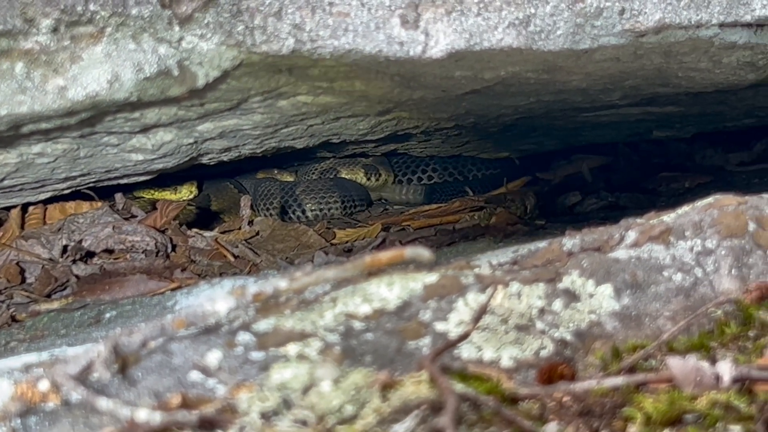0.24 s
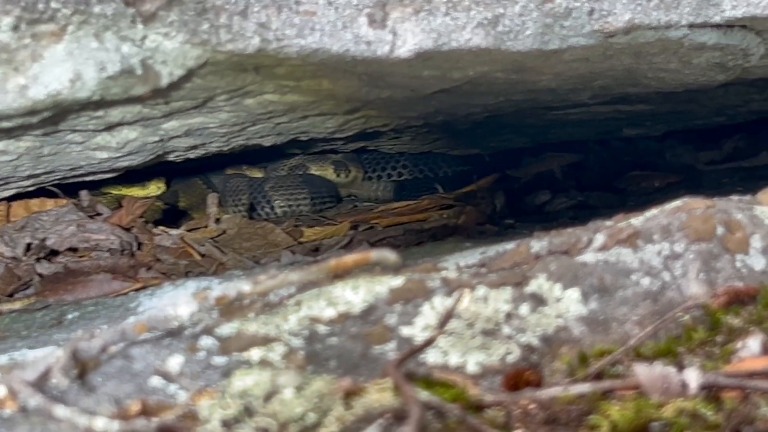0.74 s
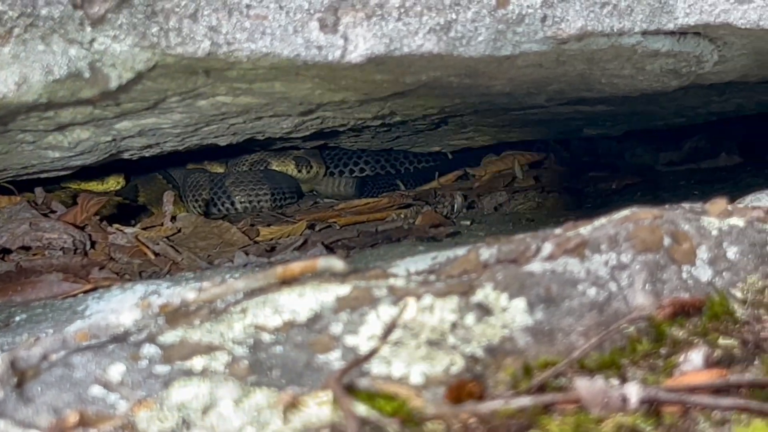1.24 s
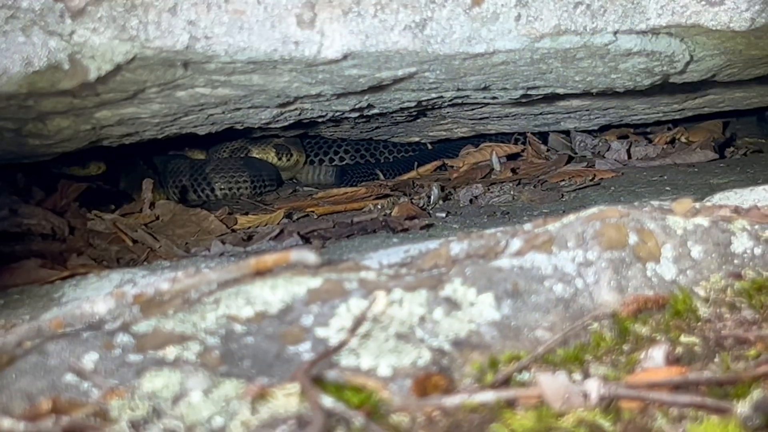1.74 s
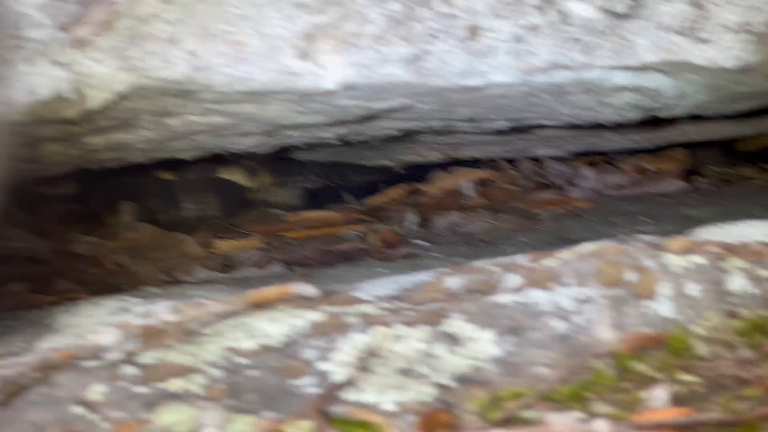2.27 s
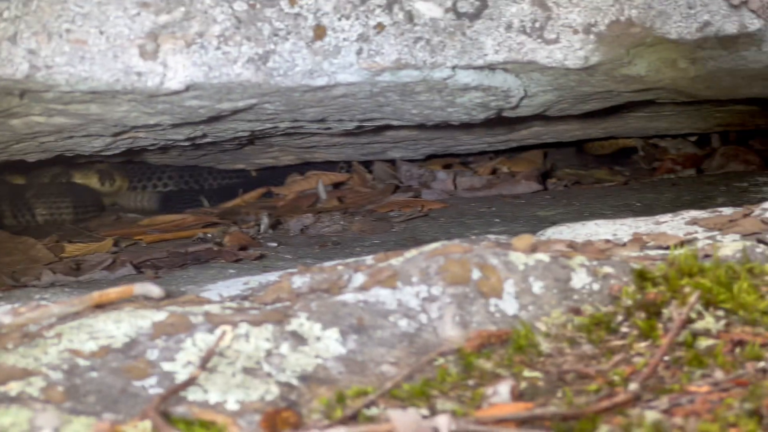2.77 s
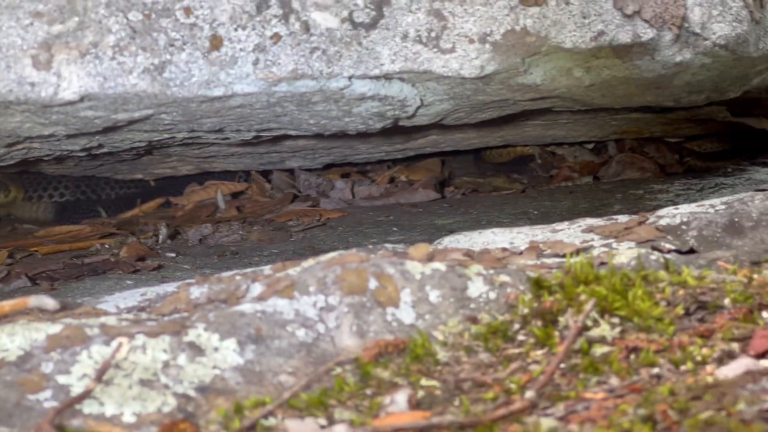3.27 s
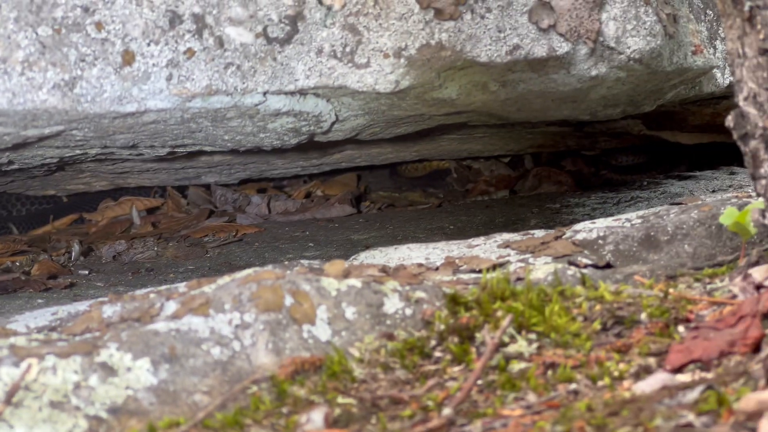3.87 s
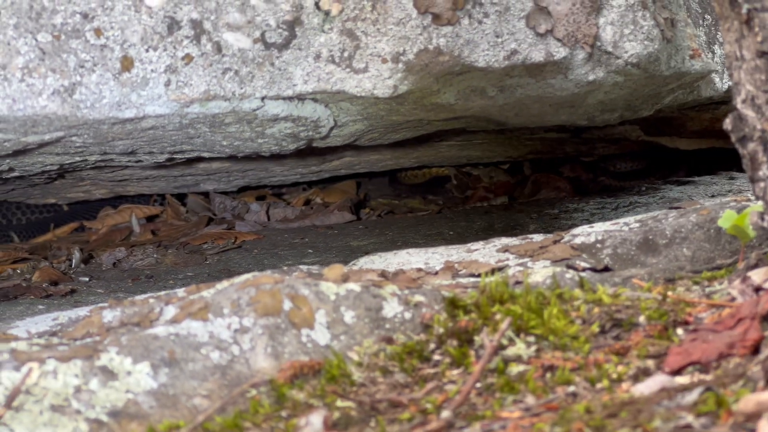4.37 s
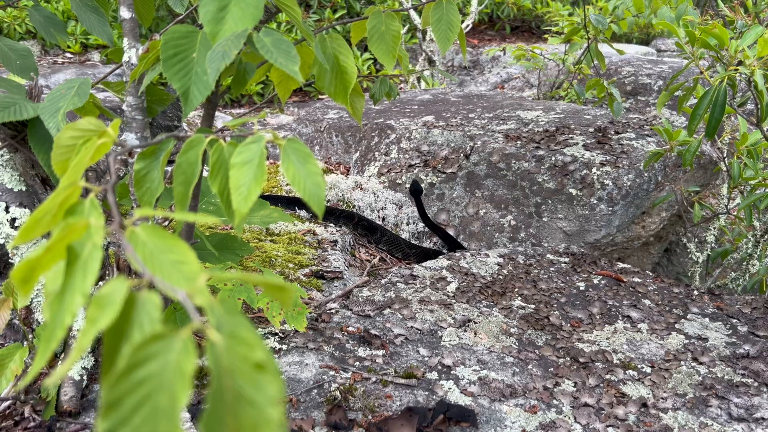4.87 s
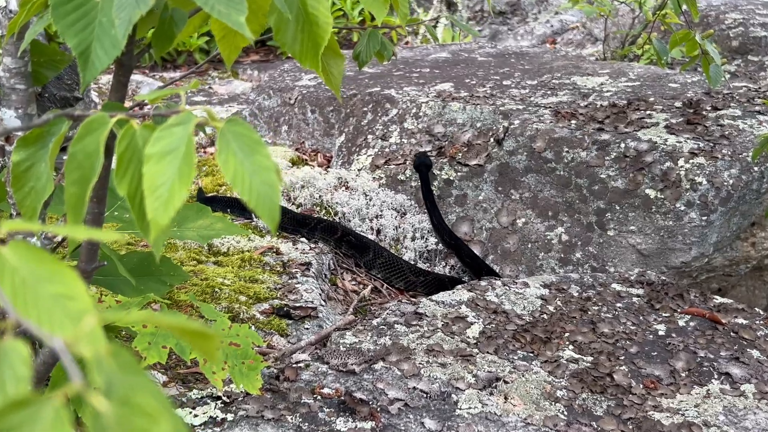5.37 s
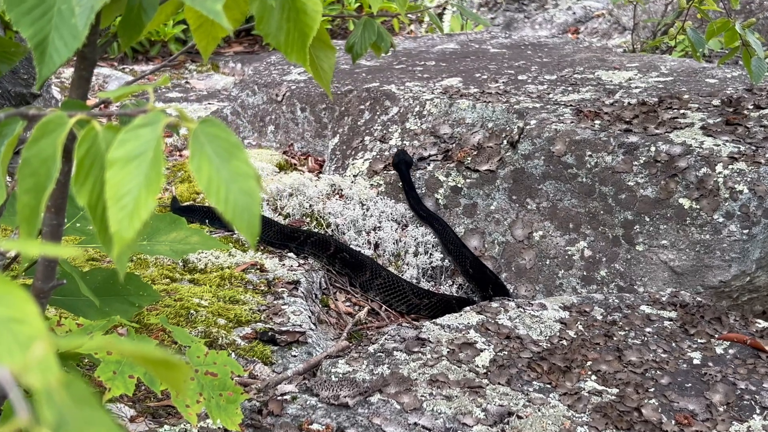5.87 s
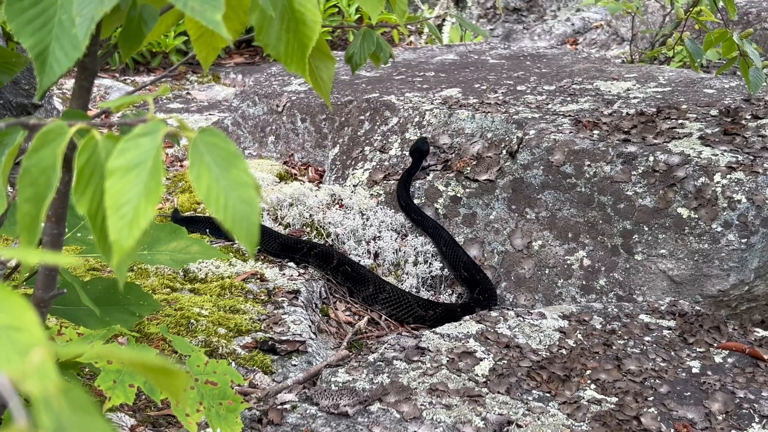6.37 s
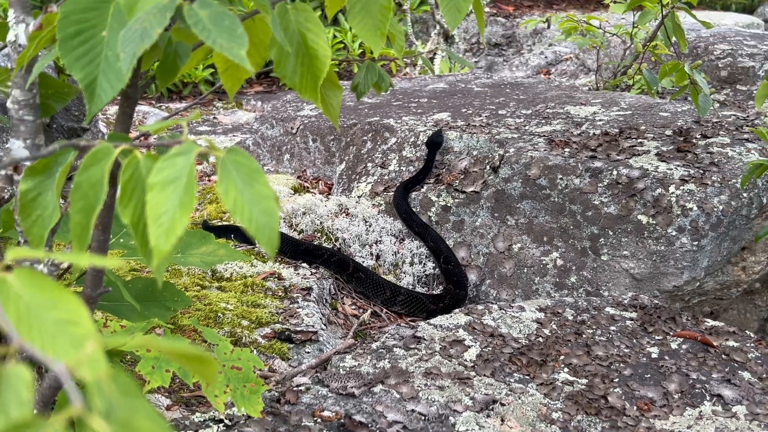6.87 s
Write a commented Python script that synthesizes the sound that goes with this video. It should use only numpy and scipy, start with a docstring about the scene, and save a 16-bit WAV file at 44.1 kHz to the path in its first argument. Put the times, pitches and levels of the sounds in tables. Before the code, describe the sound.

A rattlesnake buzzes steadily and loudly close by in a rock crevice, with camera handling bumps, then abruptly sounds softer and farther off on open rock.

```python
"""A rattlesnake buzzes close by in a rock crevice; abruptly, the rattling is heard farther off, on open rock.
The tail swings about 66 times a second; on each of its two strokes the stiff tip clacks and
the loose horn segments collide in a short cascade, coloured by a broad spectrum and narrow resonances.
A hand-held camera adds soft knocks, a juddering finger and dull grip bumps, with a low rumble
in the crevice; faint filtered-noise air lies under everything."""
import sys
import numpy as np
from scipy import signal
from scipy.fft import rfft, irfft, next_fast_len
from scipy.io import wavfile
from scipy.ndimage import map_coordinates

SR = 44100
rng = np.random.default_rng(int(sys.argv[2]) if len(sys.argv) > 2 else 0)


def store_pcm(level_fs):
    """Save levels as 16-bit WAV."""
    pcm = np.round(np.clip(level_fs, -1, 1) * 32767).astype(np.int16)
    wavfile.write(sys.argv[1], SR, np.atleast_2d(pcm).T)


N = 313992

CUT_S = 4.876  # the crevice gives way to the open rock

# Relative colour of each rattle as heard: frequency_hz, density_db (per Hz)
NEAR_COLOUR = [(300, -46.5), (680, -37), (1050, -25), (2200, -25), (3300, -20), (4500, -5), (5200, -2),
               (6500, -6), (8000, -6), (8800, -11), (9900, -48), (11200, -16), (13400, -30.5),
               (15000, -17.5)]
FAR_COLOUR = [(300, -36), (1300, -35), (2000, -20), (3000, -20), (4300, -15.5), (5000, -3), (6200, -5.5),
              (7100, -8), (8000, -8), (8700, -24.5), (9800, -47), (11500, -28.5), (13500, -36),
              (15300, -24.5)]
# Narrow resonances and dips of the hollow segments among the rocks: centre_hz, half_width_hz, gain_db
NEAR_RING = [(1208, 23, 6), (1340, 140, -2.5), (1645, 100, 5.5), (1800, 35, -9.5), (2775, 266, 10),
             (3360, 89, -1), (4554, 140, 3.5), (5186, 97, 3.5), (5600, 80, 0), (5710, 80, 3.5),
             (5796, 47, -8), (6110, 96, 2.5), (6150, 78, 0), (6730, 110, -6.5), (6796, 125, 5.5),
             (7670, 210, 7)]
FAR_RING = [(1124, 43, -20), (2470, 140, 5), (2774, 61, -11.5), (3655, 200, 8.5), (4300, 84, -24),
            (5870, 71, 0.5), (6480, 92, -10), (6880, 78, 6.5), (7220, 33, 7)]
# Relative colour of the smeared clatter at the sides: frequency_hz, density_db (per Hz)
NEAR_SIDE = [(300, -19), (850, -30), (1500, -1), (2100, -28), (2800, -5), (4100, 5), (5200, -49),
             (6500, -78), (7700, -34), (8500, -22), (9200, 8), (11200, 6), (12100, -5), (14500, 6.5)]
FAR_SIDE = [(300, -17), (750, -7.5), (1600, 2), (2100, -4), (3600, 6.5), (4200, 5), (5200, -16),
            (6500, -57), (7700, -9), (8500, -12), (9600, 6.5), (11000, -3), (12000, -9), (14500, 2)]
# Tip clack, one row for the forward and one for the return stroke: pitch_hz, relative_level_db, half_length_s
NEAR_CLACKS = [(7640, -3.5, 0.00085), (7830, -5, 0.0011)]
FAR_CLACKS = [(5100, -0.19, 0.00052), (7080, -0.8, 0.00057)]
# Colour changes while the camera stands elsewhere: centre_hz, half_width_hz, gain_db
FIRST_ANGLE = [(620, 900, 2), (3230, 450, -3), (4960, 200, 3), (6200, 120, -3), (7040, 130, 3.5),
               (7730, 150, -2.5)]
TURNING_ANGLE = [(2361, 450, 8), (3100, 130, -12), (3650, 180, -6), (4130, 180, 9.5), (7260, 440, -1.5),
                 (9140, 460, 19.5), (11440, 780, 15), (14500, 2000, 6)]
# Close rattle: level at the start, and slow growth as the camera edges along the crevice
NEAR_DB, NEAR_GROWS_DB_PER_S = -28, 0.1
# Far rattle: level once the camera faces it, slow fade from then on, offset while facing away
FAR_DB, FAR_FADES_DB_PER_S, FACING_AWAY_DB = -36.5, 0.64, -2.5
TURN_START_S, TURN_END_S = 4.95, 5.29  # the camera turns to the far rattle


def rattling():
    """The rattling is heard close in the crevice, then farther off and softer, each with its own colour."""
    near = rattle(NEAR_COLOUR, NEAR_RING, NEAR_SIDE, NEAR_CLACKS,
                  rise_s=0.0007, decay_s=0.0045, repeat=0.34, uneven_db=0.49, jitter_s=.00006,
                  back_db=-1.64, clack_db=-4.5, jolt_db=-15, side_db=-13.5)
    near = recoloured(near, FIRST_ANGLE, [(2, 1), (2.6, 0)])
    far = rattle(FAR_COLOUR, FAR_RING, FAR_SIDE, FAR_CLACKS,
                 rise_s=0.00083, decay_s=0.0035, repeat=0.31, uneven_db=0.4, jitter_s=.00012,
                 back_db=1.0, clack_db=-6.0, jolt_db=-26.0, side_db=-16.0)
    # the far rattle starts off to the left, and softer, until the camera has turned to it
    turning = [(TURN_START_S, 1), (TURN_END_S, 0)]
    facing_away = curve(turning)
    pan_db = 2.9 * facing_away * np.array([[1], [-1]])
    far = recoloured(far, TURNING_ANGLE, turning) * amp(pan_db)
    near_db = NEAR_DB + NEAR_GROWS_DB_PER_S * since(0)
    far_db = FAR_DB + FACING_AWAY_DB * facing_away - FAR_FADES_DB_PER_S * since(TURN_END_S)
    return cut(amp(near_db) * near, amp(far_db) * far)


# Tail swings: time_s, swings_per_s
SWING = [(0.0, 65.5), (0.8, 65.4), (1.25, 66.1), (1.5, 64.3), (2.45, 65.2), (2.9, 66), (3.1, 67.0),
         (3.55, 66), (3.75, 66), (4.5, 67.7), (5.3, 67), (5.6, 70), (6.2, 68.4), (7.1, 66)]
# Segments of different size share the range and answer in turn: low_hz, high_hz, lag_s
SEGMENTS = [(151, 2090, .0008), (2030, 3850, 0), (3780, 6490, .0003), (6410, 9140, -.0001),
            (8690, 16600, .0002)]


def rattle(colour, rings, side_colour, clacks, rise_s, decay_s, repeat, uneven_db, jitter_s,
           back_db, clack_db, jolt_db, side_db):
    """Two strokes a swing: each is a hard clack of the tip and a clatter of the hollow segments."""
    half_swings = 2 * np.cumsum(curve(SWING)) / SR
    turns = np.interp(np.arange(int(half_swings[-1]) + 1), half_swings, np.arange(N) / SR)
    turns = turns + jitter_s * rng.standard_normal(len(turns))
    # every second stroke is the return, with its own strength in the clatter
    back = np.arange(len(turns)) % 2
    force = amp(back_db * back + uneven_db * rng.standard_normal(len(turns)))
    contacts = sum(band(clatter(turns + lag, force, rise_s, decay_s, repeat), low, high)
                   for low, high, lag in SEGMENTS)

    # the stiff tip segment rings for about a millisecond, a little differently each time
    hz, db, half_length = np.array(clacks)[back].T[:, :, None]
    t = np.arange(-SR // 500, SR // 500) / SR
    size, detune = rng.standard_normal((len(turns), 2)).T[:, :, None]
    tone = np.sin(2 * np.pi * hz * (1 + 0.024 * detune) * t)
    ping = tone * np.exp(-(t / half_length) ** 2)
    blow = amp(db + 3.45 * np.minimum(size, 2))  # limit the random spread of clack strength
    clack = unit(impulses(turns[:, None] + .0006 + t, ping * blow))

    # the same blow also jolts the whole horn
    jolt = unit(band(impulses(turns + .0005, blow), 3320, 9400))
    shell = unit(coloured(unit(contacts) + amp(jolt_db) * jolt, colour, rings))
    mid = unit(shell + amp(clack_db) * clack)

    # a smeared clatter spreads to the sides
    smeared = clatter(turns, force, 0.00082, 0.013, repeat, count=96)
    side = amp(side_db) * unit(coloured(smeared, side_colour))
    return np.array([mid + side, mid - side])


def clatter(turns, force, rise_s, decay_s, repeat, count=48):
    """Around each turn of the tail a segment collides in a swelling, then fading cascade."""
    shape = (len(turns), count)
    spread = (np.arange(count) + rng.random(count)) / count
    delay = spread * .013 - .003 + .00003 * rng.standard_normal(shape)
    swell = np.exp(-delay / decay_s) / (1 + np.exp(-delay / rise_s))
    # a share of the contacts recurs from swing to swing (two strokes), in a pattern that drifts slowly
    habit = unit(signal.lfilter([1], [1, 0, -.95], rng.standard_normal(shape), axis=0))
    share = np.clip(repeat, 0, 1)
    chance = rng.choice([-1, 1], shape)
    contacts = np.sqrt(share) * habit + np.sqrt(1 - share) * chance
    return unit(impulses(turns[:, None] + delay, force[:, None] * swell * contacts))


# Soft knocks on the camera: start_s, level_db (before the gain and tap shape in knocks)
KNOCKS = [(0.612, -32), (0.623, -39), (0.895, -46), (1.16, -51), (1.194, -49), (1.258, -47), (2.106, -53),
          (4.586, -54), (5.063, -47)]


def knocks(start_hz=800, end_hz=265, glide_s=0.0023, decay_s=0.0021, hardness=0.17,
           body_hz=135, body_db=-16, gain_db=9, side_db=-1):
    """A knock spreads as a bending wave, high notes first, with a short low thud; harder knocks are brighter."""
    t = np.arange(SR // 25) / SR
    start, db = np.vstack([KNOCKS, judder()]).T[:, :, None]
    bright_hz = start_hz * amp(hardness * (db - db.mean()))
    pitch_hz = end_hz + (bright_hz - end_hz) * np.exp(-t / glide_s)
    tap = np.sin(2 * np.pi * np.cumsum(pitch_hz, axis=1) / SR) * (t / decay_s) * np.exp(-t / decay_s)
    thud = amp(body_db) * np.sin(2 * np.pi * body_hz * t) * np.exp(-t / 0.01)
    mid = impulses(np.round(start * SR) / SR + t, amp(db + gain_db) * (tap + thud))
    # the two microphone ports are shaken out of phase: the side is shifted a quarter cycle
    side = amp(side_db) * signal.hilbert(mid).imag / 2
    return np.array([mid + side, mid - side])


# A finger judders over the case: start, mean gap between slips, first slip (before the knocks gain), loss per slip
JUDDER_START_S, JUDDER_GAP_S, JUDDER_DB, JUDDER_LOSS_DB = .655, .0222, -42.5, 1.7


def judder(count=6):
    """A finger sticks and slips in a quick, slightly uneven run of fading taps: rows of start_s, level_db."""
    slip = np.arange(count)
    times = JUDDER_START_S + JUDDER_GAP_S * slip + 0.0011 * rng.standard_normal(count)
    return np.column_stack([times, JUDDER_DB - JUDDER_LOSS_DB * slip])


# Dull bumps of the grip: start_s, level_db (before the gain and thud shape in bumps)
BUMPS = [(1.194, -35), (1.26, -35), (1.295, -32), (1.335, -39), (2.219, -36), (2.679, -42.5), (3.077, -38),
         (3.466, -44), (3.98, -45), (4.58, -34.5), (4.829, -39.5)]
# What the held camera rings with: pitch_hz, relative_level_db, decay_s
GRIP = [(80.3, -2, .013), (135, -1.5, 0.0076), (267, -5.5, 0.0073), (378, -9, 0.0058)]


def bumps(attack_s=0.0056, gain_db=2):
    """The grip shifts with short, heavily damped thuds, each a sum of decaying low tones."""
    t = np.arange(SR // 8) / SR
    start, db = np.transpose(BUMPS)
    thud = sum(amp(level) * np.sin(2 * np.pi * hz * t) * np.exp(-t / decay) for hz, level, decay in GRIP)
    soft_thud = thud * (1 - np.exp(-t / attack_s))
    return signal.fftconvolve(impulses(start, amp(db + gain_db)), soft_thud)[:N]


# Relative colours of the handling rumble and the air: frequency_hz, density_db (per Hz)
RUMBLE = [(20, -36), (35, -12), (52, -1), (72, 1.5), (130, -5.5), (250, -16), (450, -25), (900, -46),
          (2000, -54)]
AIR = [(20, -20), (55, 4.5), (200, 0.5), (450, -10.5), (900, -8.5), (2000, -6), (8000, -31.5)]
# Resting level of the handling rumble in the crevice: time_s, level_db
RUMBLE_REST = [(0, -55.5), (1.1, -53.5), (2.9, -54.5), (4.2, -56.5)]
# The rumble swells with each bump: level relative to the bump's table level, time to settle
STIR_DB, SETTLE_S = -14, 0.067
# Faint outdoor air: level in the crevice and on the open rock, start and speed of its fade
NEAR_AIR_DB, FAR_AIR_DB, AIR_FADE_START_S, AIR_FADES_DB_PER_S = -64, -65.5, 6.15, 8


def background():
    """Lumpy filtered-noise rumble in the crevice, stirred up by each grip bump, over faint outdoor air."""
    lumps_db = 2.0 * wobble(22.03)
    rumble = unit(coloured(rng.standard_normal((2, N)), RUMBLE) * amp(lumps_db))
    air = unit(coloured(rng.standard_normal((2, N)), AIR))
    stirs = [amp(db + STIR_DB) * (since(start) > 0) * np.exp(-since(start) / SETTLE_S) for start, db in BUMPS]
    # resting and stirred rumble add as powers
    grip = np.sqrt(amp(curve(RUMBLE_REST)) ** 2 + np.sum(np.square(stirs), axis=0))
    air_db = cut(NEAR_AIR_DB, FAR_AIR_DB - AIR_FADES_DB_PER_S * since(AIR_FADE_START_S))
    mid, spread = cut(grip, 0) * rumble + amp(air_db) * air
    return stereo(mid, spread)


# Width of the handling rumble and air: frequency_hz, side_to_mid_db
WIDTH = [(30, -12), (70, -12), (150, -11.5), (400, -3), (1000, -10.5)]


def stereo(mid, spread):
    """One noise in the middle, a second at the sides, its width set by frequency."""
    side = coloured(spread, WIDTH)
    return np.array([mid + side, mid - side])


def recoloured(x, rings, share):
    """Reflections shift with the camera's place: blend in a second colouring by share."""
    return x + curve(share) * (coloured(x, [(1, 0.045)], rings) - x)


def coloured(x, spectrum, rings=()):
    """Causal minimum-phase filter with a broad spectrum and narrow resonances or dips on it."""
    size = 2 * next_fast_len(N // 2 + 4096)
    f = np.fft.rfftfreq(size, 1 / SR)
    db = along(spectrum, f) + sum(gain * np.exp(-((f - hz) / width) ** 2) for hz, width, gain in rings)
    # folding the cepstrum forward in time makes the filter causal
    cepstrum = irfft(np.log(amp(db)))
    cepstrum[1:size // 2] *= 2
    cepstrum[size // 2 + 1:] = 0
    return irfft(rfft(x, size) * np.exp(rfft(cepstrum)))[..., :N]


def band(x, low_hz, high_hz):
    """Causal band-pass."""
    sos = signal.butter(4, [low_hz, min(high_hz, .45 * SR)], "band", fs=SR, output="sos")
    return signal.sosfilt(sos, x)


def impulses(times, sizes):
    """One impulse at each time, summed where they coincide."""
    at = np.clip(np.round(times * SR), 0, N).astype(int)
    return np.bincount(at.ravel(), sizes.ravel(), N + 1)[:N]


def amp(db):
    """Decibels to gain."""
    return 10 ** (np.asarray(db) / 20)


def unit(x):
    """Scale to rms 1."""
    return x / np.sqrt(np.mean(x ** 2) + 1e-20)


def along(points, hz):
    """Interpolate (frequency_hz, value) points on a log axis."""
    f, v = np.transpose(points)
    return np.interp(np.log(hz + 1), np.log(f + 1), v)


def curve(rows):
    """Interpolate (time_s, value) rows to one value per sample."""
    return np.interp(np.arange(N) / SR, *np.transpose(rows))


def wobble(rate):
    """A smooth random curve, rate knots a second."""
    return map_coordinates(rng.standard_normal(int(N * rate / SR) + 4), [np.arange(N) * rate / SR])


def since(start_s):
    """Seconds gone by since the start, zero before it."""
    return np.maximum(np.arange(N) / SR - start_s, 0)


def cut(near, far):
    """The crevice gives way abruptly to the open rock."""
    return np.where(np.arange(N) / SR < CUT_S, near, far)


def scene():
    """Rattling, handling and air."""
    return rattling() + knocks() + bumps() + background()


def record(dry, top_hz=15750):
    """The camera keeps nothing above its band limit."""
    size = next_fast_len(N + 4096)
    kept = np.fft.rfftfreq(size, 1 / SR) < top_hz
    return irfft(rfft(dry, size) * kept, size)[:, :N]


dry = scene()
out = record(dry)
store_pcm(out)
```